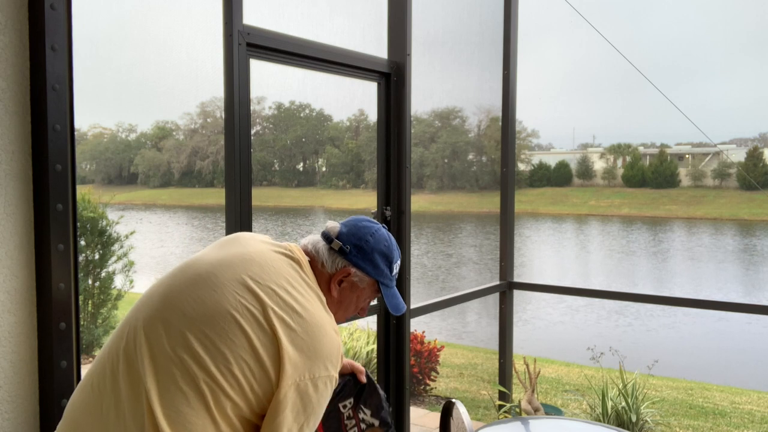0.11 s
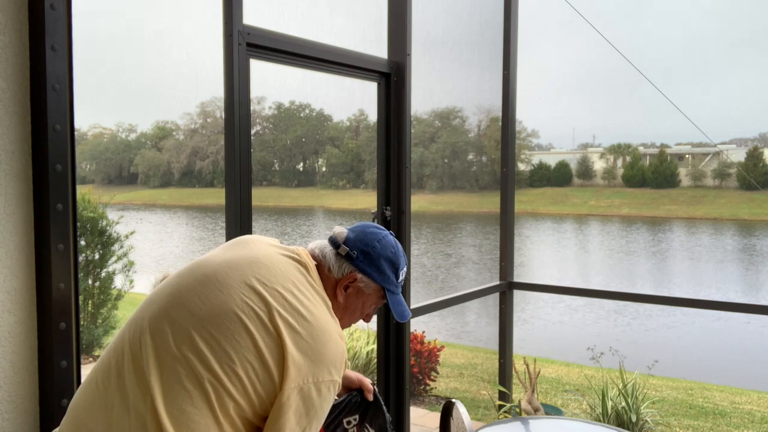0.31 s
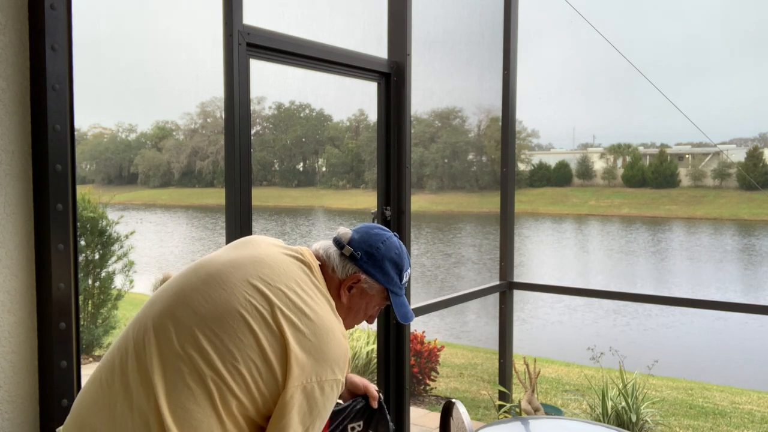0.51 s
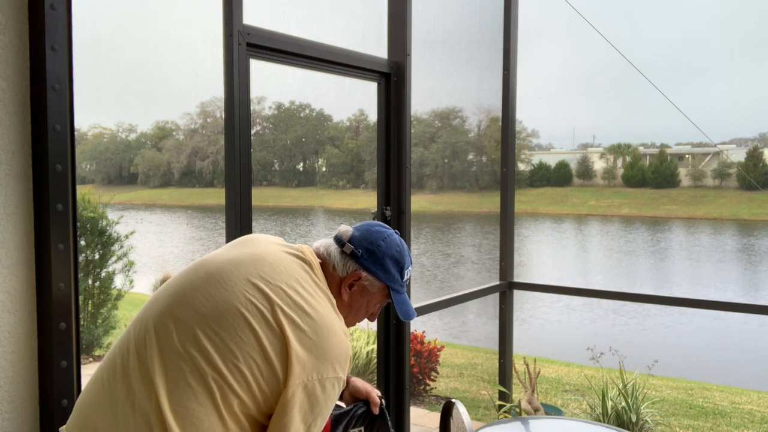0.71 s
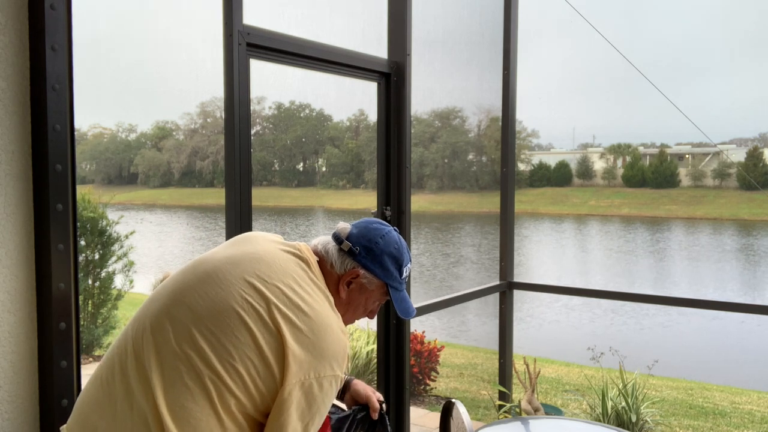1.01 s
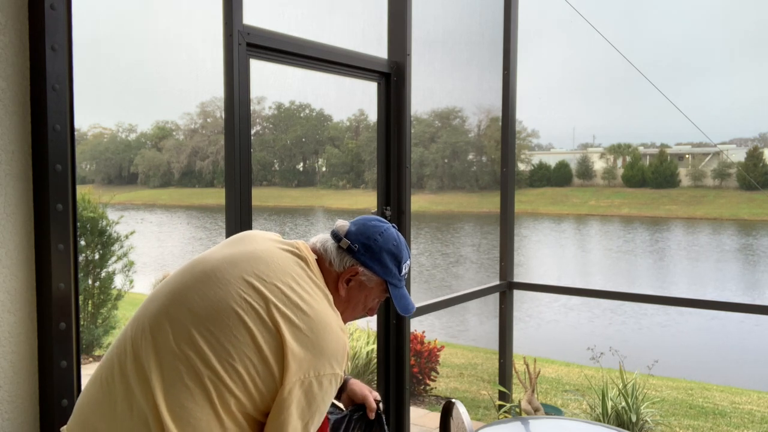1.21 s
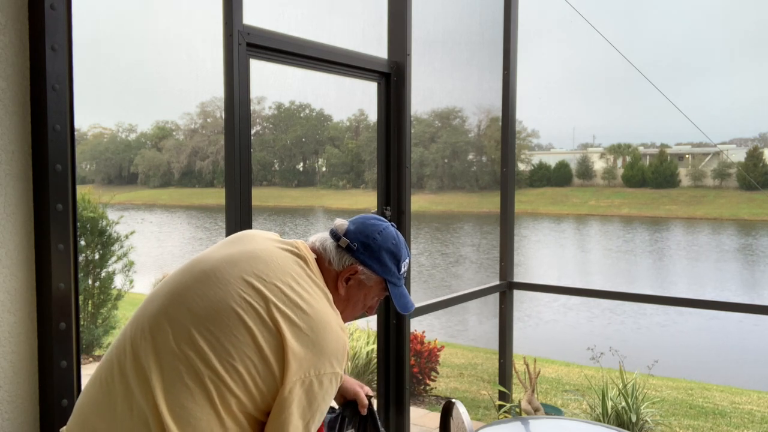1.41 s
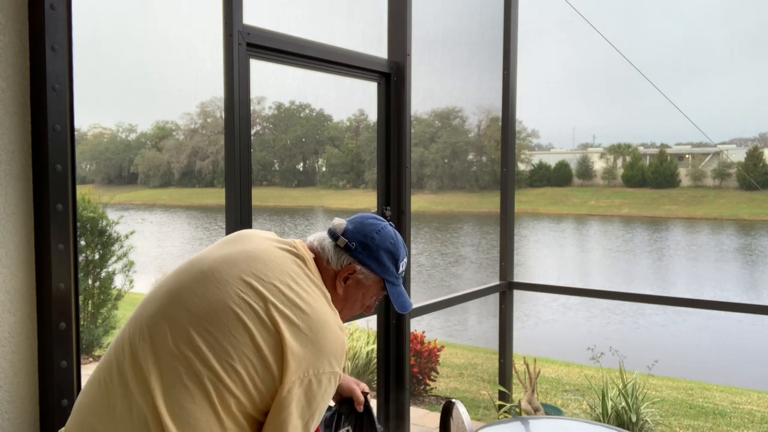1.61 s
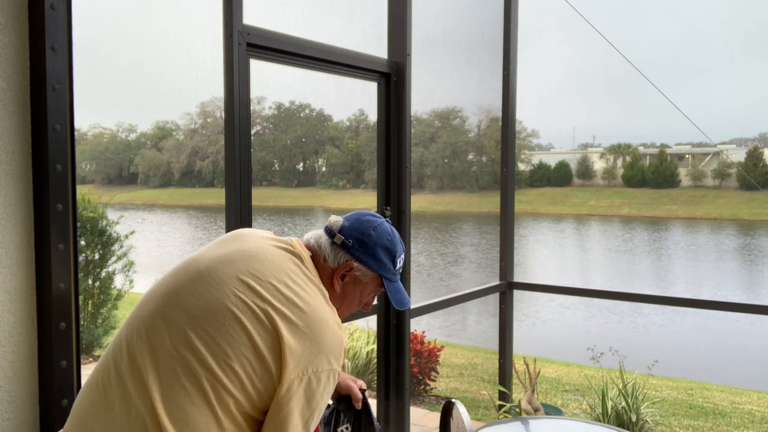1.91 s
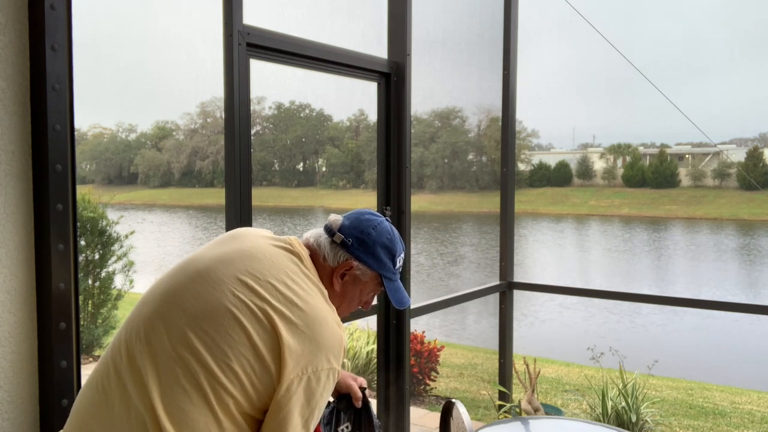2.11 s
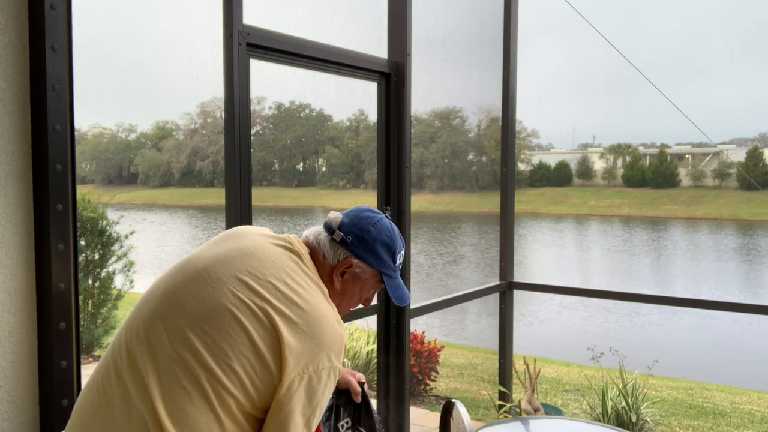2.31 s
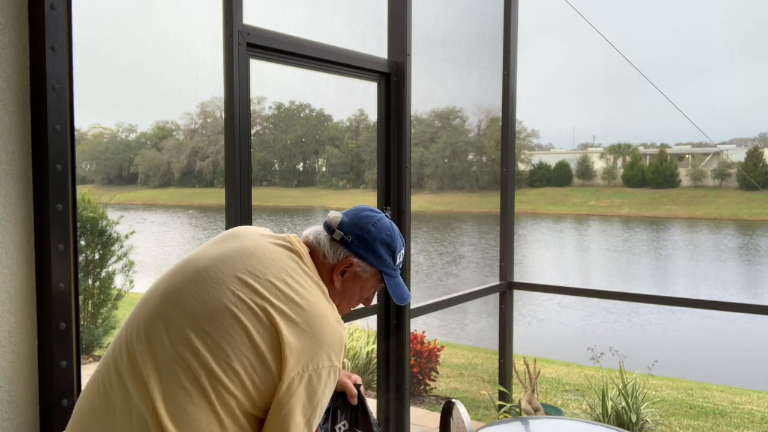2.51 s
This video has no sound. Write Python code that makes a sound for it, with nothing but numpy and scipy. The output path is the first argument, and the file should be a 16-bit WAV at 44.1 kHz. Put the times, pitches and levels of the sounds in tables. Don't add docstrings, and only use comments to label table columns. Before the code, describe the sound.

A rush of wood pellets clatters into a hollow metal box, then dwindles to scattered ticks

```python
import sys
import numpy as np
from scipy import signal
from scipy.fft import rfft, irfft, next_fast_len
from scipy.io import wavfile
from scipy.ndimage import uniform_filter1d, map_coordinates

SR = 44100
rng = np.random.default_rng(int(sys.argv[2]) if len(sys.argv) > 2 else 0)


def volts(x):
    e = np.asarray(x, float) / 20
    return 10 ** e


def store_wav(level_fs):
    pcm = np.round(np.clip(np.atleast_2d(level_fs), -1, 1) * 32767)
    wavfile.write(sys.argv[1], SR, pcm.T.astype(np.int16))


N = 119070
TIME_S = np.arange(N) / SR

# (time [s], stream level [dB], then over the stream: wall ringing [dB], box boom [dB],
# heap thud [dB])
STREAM = [(0, -45, 22, 4.5, 10.5), (.2, -44, 6, -4, 0), (.225, -25.5, -7, -9, -8.5),
          (.3, -19, -6, -15.5, -25), (.45, -20.5, -4, -15, -19), (.56, -15.5, -0.5, -15.5, -16),
          (.65, -14.5, 0, -7.5, -11), (.93, -15, -1.5, -7, -8.5), (1.06, -19.5, -5.5, -7, -9.5),
          (1.3, -25, -10, -5.5, -7.5), (1.6, -31.5, -5.5, -7.5, -5), (1.81, -34, -16, -8.5, -13),
          (2.0, -36, -4.5, -1.5, -1.5), (2.325, -34, -6.5, -5, -8), (2.345, -26, -7, -16, -16),
          (2.45, -28, -8.5, -11, -8.5), (2.6, -40, -39, -5, -20), (2.7, -35.5, -6, -15, -3.5)]


def unit(x):
    return x / np.sqrt(np.mean(x ** 2) + 1e-20)


def along(points, hz):
    f, v = np.transpose(points)
    return np.interp(np.log(hz + 1), np.log(f + 1), v)


def wobble(rate_hz):
    knots = rng.standard_normal(int(N * 40 / SR) + 4)
    return map_coordinates(knots, [TIME_S * min(rate_hz, 40)])


def changeover(at_s, width_s):
    return 1 / (1 + np.exp(np.clip((at_s - TIME_S) / width_s, -50, 50)))


def filtered(x, response):
    m = next_fast_len(N + SR // 2)
    return irfft(rfft(x, m) * response(np.fft.rfftfreq(m, 1 / SR)), m)[..., :N]


def impacts(per_s, spread_db):
    chance = rng.random((3, N))
    size = rng.exponential(size=(3, N))
    sign = rng.standard_normal((3, N))
    return unit((chance < per_s / SR) * volts(spread_db * size) * sign)


def modes(table):
    def response(f):
        total = 0
        for k, (mode_hz, db, t60_s) in enumerate(table):
            damping = 1j * f * (3.2 / t60_s)
            resonance = damping / (mode_hz ** 2 - f ** 2 + damping)
            total = total + (-1) ** k * volts(db) * resonance ** 2
        return total
    return response


def struck(hits, gain, response):
    return filtered(hits * gain, response) / np.std(filtered(hits, response))


def changing(hits, gain, before, after, late):
    early_part = struck(hits, gain * np.sqrt(1 - late), modes(before))
    return early_part + struck(hits, gain * np.sqrt(late), modes(after))


def tinted(x):
    z = signal.stft(x, nperseg=256)[2]
    field = rng.standard_normal(z.shape[1:])
    for axis in (0, 1):
        field = uniform_filter1d(field, size=5, axis=axis)
    patch_db = 2.5 * (unit(field) - .3)
    return signal.istft(z * volts(patch_db), nperseg=256)[1][:, :N]


def outdoors():
    # (frequency [Hz], level [dB per Hz])
    air_spectrum = [(25, -20), (45, -4.5), (65, -3), (120, -0.5), (200, -8), (600, -10.5), (2500, -14),
                    (16000, -38)]
    noise = rng.standard_normal((3, N))
    air = unit(filtered(noise, lambda hz: volts(along(air_spectrum, hz)) * (hz > 20)))
    return volts(-34 + .6 * wobble(rate_hz=3.42)) * air


def porch(x):
    # (frequency [Hz], t60 [s])
    porch_t60 = [(200, 0.073), (2000, 0.54), (10000, 0.18)]
    delay = 130
    hz, t, z = signal.stft(rng.standard_normal((3, SR // 3)), SR, nperseg=256)
    decay = volts(-60 * t / along(porch_t60, hz)[:, None])
    tail = signal.istft(z * decay, SR, nperseg=256)[1]
    late = np.pad(x, ((0, 0), (delay, 0)))
    return signal.fftconvolve(late, tail / np.linalg.norm(tail[0]), axes=1)[:, :N]


def bag():
    # (time [s], peak level [dB], length [s], low part under the bright part [dB])
    folds = [(0.078, -44, 0.017, 2), (0.151, -32.5, 0.0093, 1), (0.207, -16.5, 0.0082, 28),
             (0.252, -27, 0.02, 0), (0.264, -22, 0.01, 3), (0.298, -7, 0.012, 26), (0.452, -16, 0.03, 6.5),
             (0.484, -12, 0.013, -6), (0.53, -2, 0.011, 30), (0.556, -27, 0.029, 10),
             (0.567, -7, 0.039, 14), (0.653, -8.5, 0.026, 15), (0.724, -31, 0.017, -4),
             (0.86, -14, 0.042, -1), (0.9575, -12, 0.017, 6), (0.981, -17.5, 0.036, -3),
             (1.154, -21, 0.015, -2), (1.2246, -16.5, 0.012, 9), (1.409, -26, 0.034, 7),
             (1.739, -25, 0.026, 4), (1.821, -18.5, 0.023, 6), (1.859, -19.5, 0.0091, 16),
             (1.906, -19.5, 0.019, 32), (2.118, -28, 0.04, 13), (2.292, -28.5, 0.0091, -2),
             (2.338, -25.5, 0.014, -3), (2.623, -31, 0.0096, 24), (2.688, -24, 0.02, -5)]
    # (frequency [Hz], level [dB per Hz])
    film_spectrum = [(300, -31), (1000, 10), (3000, 4), (8000, 5), (13000, 2.5), (16000, -8.5)]
    rustle_db, rustle_follows, fold_db = -4.5, 0.75, 2
    lead_s, rise_s = 0.00039, 0.0034
    stream_s, flow_db = np.transpose(STREAM)[:2]
    bright = volts(rustle_db + rustle_follows * np.interp(TIME_S, stream_s, flow_db))
    dull = np.zeros(N)
    for at_s, db, length_s, under_db in folds:
        u = np.clip(TIME_S - at_s + lead_s, 0, None)
        shape = volts(db + fold_db) * np.clip(u / rise_s, 0, 1) * np.exp(-(u / length_s) ** 1.5)
        bright = bright + shape
        dull = dull + shape * volts(-abs(under_db))
    snaps = impacts(per_s=12000, spread_db=1.8)
    film = filtered(snaps, lambda hz: volts(along(film_spectrum, hz)))
    top = filtered(film, lambda hz: hz ** 2 / (hz ** 2 + 4000 ** 2))
    return (bright * top + dull * (film - top)) / np.std(film)


def lip():
    # (frequency [Hz], level [dB], t60 [s])
    first_modes = [(3330, 0, .03), (3480, 0, .035)]
    later_modes = [(3580, -3, .04), (3680, 0, .05), (3780, -3, .04), (4050, -7, .03)]
    start_s, rise_s, fall_s, level_db = .205, .05, .12, -15.5
    u = np.clip(TIME_S - start_s, 0, None)
    rise = np.clip(u / rise_s, 0, 1) ** .6
    fall = np.exp(-(np.clip(u - rise_s, 0, None) / fall_s) ** 3)
    hits = impacts(per_s=2300, spread_db=6.0)
    late = changeover(at_s=.295, width_s=.02)
    return changing(hits, volts(level_db) * rise * fall, first_modes, later_modes, late)


def pings():
    # (time [s], peak level [dB], note [Hz])
    single_pellets = [(0.071, -28.5, 2560), (.149, -28, 1900), (.211, -37, 3370), (.236, -33, 3600),
                      (0.264, -19.5, 1620), (0.292, -15, 1626), (.291, -19, 3430), (.313, -19, 2180),
                      (.328, -16, 3750), (.368, -11.5, 3690), (.388, -18, 2070), (.396, -13, 3990),
                      (.413, -14, 1630), (.552, -5, 2116), (.577, -5.5, 2194), (.578, -6, 3710),
                      (.65, -16, 2220), (.753, -13, 1650), (.797, -9.5, 1950), (.86, -7.5, 2730),
                      (.868, -7, 2210), (.963, -11, 2234), (.978, -12, 2500), (1.357, -21, 1570),
                      (1.418, -23, 1055), (1.565, -24.5, 1127), (1.668, -25, 1480), (1.822, -28, 2115),
                      (1.911, -28.5, 1520), (2.048, -26, 830), (2.118, -28, 1490), (2.172, -31, 1130),
                      (2.295, -25.5, 1710), (2.341, -22, 1610), (2.358, -25, 1155), (2.386, -21.5, 1104),
                      (2.408, -24.5, 1510), (2.431, -22, 3000), (2.668, -38, 975), (2.689, -29, 2270),
                      (.55, -13, 363), (.815, -23, 346), (.83, -27.5, 257), (.87, -21, 297),
                      (.93, -15.5, 260), (.99, -12.5, 361), (1.1, -19, 249), (1.895, -31, 526),
                      (1.915, -27, 665), (2.046, -26.5, 532), (1.862, -31.5, 2600)]
    t60_s, bounce_s, loss_db = 0.03, .006, 6
    crack_db, crack_t60_s = -4, 0.0031
    out = np.zeros((3, N + SR))
    t = np.arange(SR // 8) / SR
    for at_s, db, hz in single_pellets:
        turn = rng.random((3, 3, 1)) / 4
        off = rng.standard_normal(3)
        noise = rng.standard_normal((3, len(t)))
        slow = np.sqrt(2000 / hz)
        envelope = np.clip(t * hz / 1.5, 0, 1) * volts(-60 * t / (t60_s * slow))
        crack = volts(crack_db - 60 * t / crack_t60_s) * noise / max(slow, 1) ** 2
        for k in range(3):
            note_hz = hz * (1 + 0.049 * off[k] * (k > 0))
            ring = envelope * np.sin(2 * np.pi * (note_hz * t + turn[k]))
            start = round((at_s + k * bounce_s * slow * (1 + 0.23 * off[k])) * SR)
            out[:, start:start + len(t)] += volts(db - loss_db * k) * (ring + crack)
    return out[:, :N]


def pellets():
    # (time [s], swell [dB], half length [s], extra swell of walls, box and heap [dB])
    lumps = [(0.316, 8, 0.0076, 2), (0.367, 3, 0.0035, -0.5), (0.422, 0, 0.014, 4),
             (0.501, 9.5, 0.0067, -9), (0.562, 1, 0.0036, 3), (0.604, 3, 0.013, -5), (0.63, 0, 0.017, -8.5),
             (0.694, 2.5, 0.056, -6.5), (.77, 5, 0.027, -8.5), (.82, 2.5, 0.041, -2), (0.873, -3, 0.017, 4),
             (1.099, -5, 0.0097, 5.5), (1.347, -4, 0.0099, 6), (1.418, -1, 0.031, 3.5),
             (1.579, 3, 0.014, -0.5), (1.677, 3.5, 0.009, 7), (1.722, 7.5, .008, -15),
             (1.8, -7.5, 0.018, 9), (1.907, -7.5, 0.014, 13), (2.047, 6.5, 0.014, -2), (2.1, -8, 0.034, 7),
             (2.135, 9, 0.016, -13), (2.24, -3, 0.013, 1.5), (2.412, 1.5, 0.008, -6),
             (2.435, 1.5, 0.0099, -9)]
    # (frequency [Hz], level [dB per Hz])
    clatter_spectrum = [(150, -15), (400, -11.5), (1000, 0), (2500, 2), (5000, 3.5), (8000, 1), (12000, -6),
                        (16000, -5.5)]
    # (frequency [Hz], level [dB], t60 [s])
    bare_wall = [(1270, -11, 0.074), (1447, -11, 0.081), (1620, 5.5, 0.082), (1745, 1, 0.032),
                 (2043, -1.5, 0.052), (2217, 3.5, 0.06), (2460, -15, 0.063), (2740, -11, 0.046),
                 (3620, -0.5, 0.017), (4600, -7, 0.08), (4720, -9, 0.044)]
    loaded_wall = [(1262, 2, 0.16), (1439.6, -2, 0.048), (1620, 2, 0.065), (1762, -0.5, 0.06),
                   (1950, -0.5, 0.07), (2136, -3, 0.046), (2240, -9, .06), (2460, -3.5, 0.065),
                   (2652, -2.5, 0.069), (3246, -7, 0.027), (3715, -3, 0.049), (3950, -8.5, 0.056),
                   (4250, -24, 0.069), (4590, 0.5, 0.064)]
    # (frequency [Hz], level [dB], t60 [s])
    empty_box = [(252.7, -2.5, 0.15), (311, -3, 0.11), (361, -1, 0.12), (404, -3.5, 0.1)]
    filled_box = [(252.8, -3.5, .13), (305.2, -1, .12), (351.6, -0.5, 0.13), (397.6, -13, 0.08)]
    # (frequency [Hz], level [dB], t60 [s])
    heap_modes = [(464, 2, 0.028), (626, 3.5, 0.024), (764, 3, 0.02), (919, 2.5, 0.015), (1082, 2.5, 0.03),
                  (1228, -1.5, 0.0098)]
    stream_db, surge_db, patch_db = 2.5, .6, 1.1
    walls_reached_s, loaded_s, filled_s, change_s = .235, 0.54, 0.83, 0.01

    stream_s, *columns = np.transpose(STREAM)
    flow_db, wall_db, box_db, heap_db = [np.interp(TIME_S, stream_s, c) for c in columns]
    lump_db, body_db = np.zeros(N), np.zeros(N)
    for at_s, swell_db, half_s, more_db in lumps:
        skew = np.where(TIME_S < at_s, 1.6, .85)
        bump = np.exp(-((TIME_S - at_s) / half_s * skew) ** 2)
        lump_db = lump_db + swell_db * bump
        body_db = body_db + more_db * bump
    surge = wobble(rate_hz=11.95) + wobble(rate_hz=35)
    flow_db = flow_db + stream_db + lump_db + surge_db * surge
    body_db = body_db + flow_db
    wall_db = wall_db - 20 * np.clip((walls_reached_s - TIME_S) / .02, 0, 1)

    hits = impacts(per_s=7000, spread_db=1.2)
    clatter = struck(hits, volts(flow_db), lambda hz: volts(along(clatter_spectrum, hz)))
    hits = impacts(per_s=2500, spread_db=3.5)
    gain = volts(body_db + wall_db + patch_db * wobble(rate_hz=15.03))
    walls = changing(hits, gain, bare_wall, loaded_wall, changeover(loaded_s, change_s))
    hits = impacts(per_s=1500, spread_db=2.0)
    gain = volts(body_db + box_db + patch_db * wobble(rate_hz=6.15))
    boom = changing(hits, gain, empty_box, filled_box, changeover(filled_s, change_s))
    hits = impacts(per_s=1200, spread_db=2.0)
    gain = volts(body_db + heap_db + patch_db * wobble(rate_hz=32))
    thud = struck(hits, gain, modes(heap_modes))
    return tinted(clatter) + walls + boom + thud


def ports(three):
    # (frequency [Hz], share of power alike at both ports)
    direct_share = [(100, 0.87), (350, 0.89), (700, 0.12), (2000, 0.56), (4000, 0.53), (7000, 0.45),
                    (12000, 1)]
    lag_s, left_db = 6.6e-5, -.5

    def share(hz):
        return np.clip(along(direct_share, hz), 0, 1)

    def lag(hz):
        return np.exp(1j * np.pi * lag_s * np.outer([-1, 1], hz))

    direct = filtered(three[[0, 0]], lambda hz: np.sqrt(share(hz)) * lag(hz))
    scattered = filtered(three[1:], lambda hz: np.sqrt(1 - share(hz)))
    return (direct + scattered) * volts([[left_db / 2], [-left_db / 2]])


def scene():
    near = pellets() + lip() + tinted(bag()) + pings()
    return ports(near + volts(-11) * porch(near) + outdoors())


def roll_off(x):
    return signal.sosfilt(signal.butter(12, 15730, fs=SR, output="sos"), x)


def record(dry):
    ceiling, knee = 1.2, 3
    cut = filtered(dry, lambda hz: (1j * hz / (1j * hz + 45)) ** 2)
    soft = cut / (1 + np.abs(cut / ceiling) ** knee) ** (1 / knee)
    return roll_off(soft)


dry = scene()
out = record(dry)
store_wav(out)
```